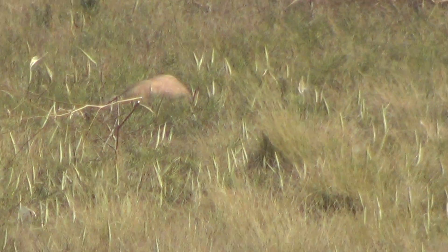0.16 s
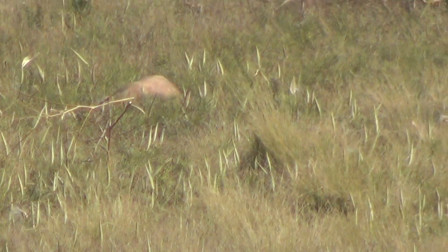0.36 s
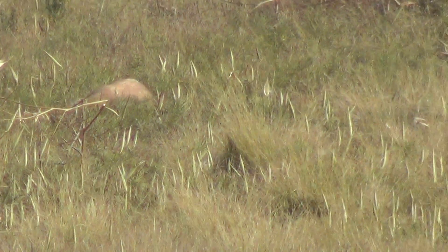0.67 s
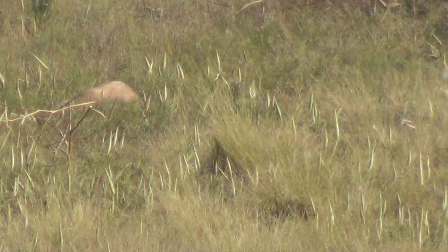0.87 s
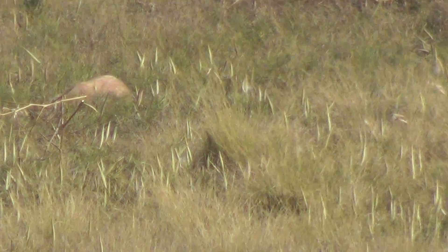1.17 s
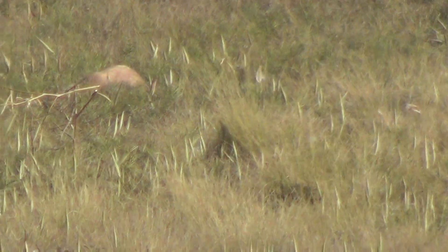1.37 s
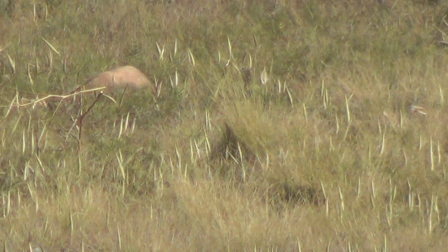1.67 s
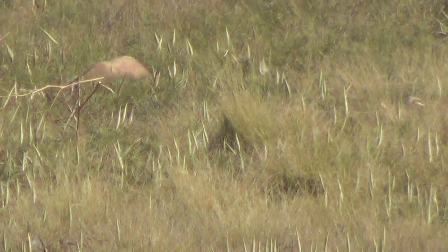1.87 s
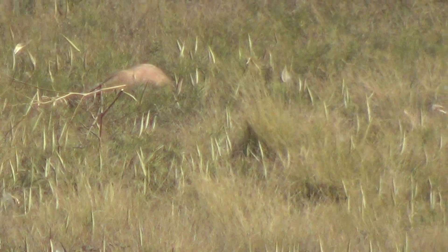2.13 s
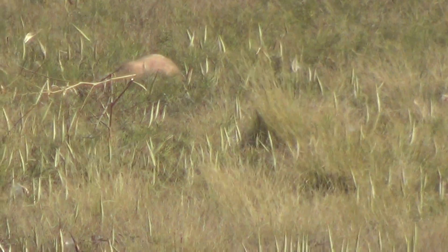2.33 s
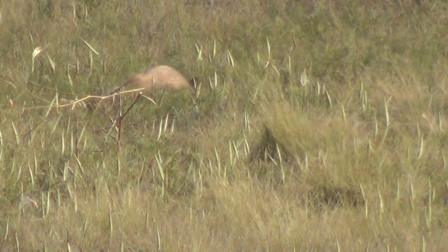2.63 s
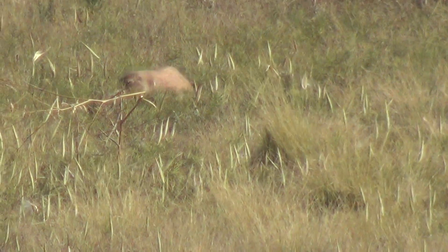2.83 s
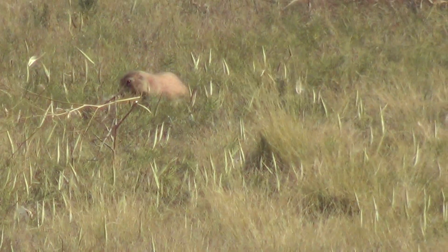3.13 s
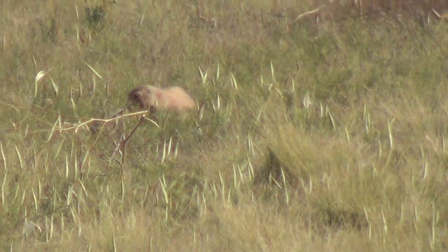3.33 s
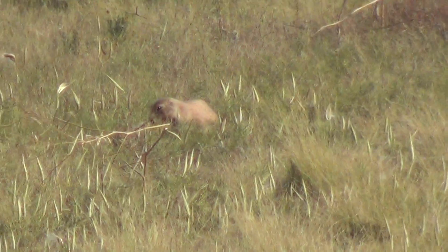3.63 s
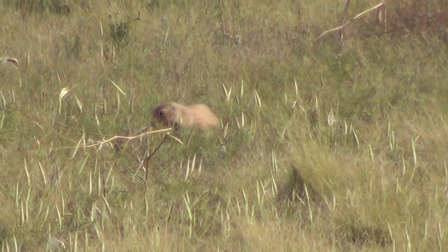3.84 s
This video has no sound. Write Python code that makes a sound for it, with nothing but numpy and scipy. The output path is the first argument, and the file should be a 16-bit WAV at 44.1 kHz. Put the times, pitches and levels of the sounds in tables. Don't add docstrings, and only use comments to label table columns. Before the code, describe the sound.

A prairie dog gives one short, high bark at 2.3 s, breaking rough at its peak, then a weak two-part wheeze at 2.7 s. Tiny far yips sound at 0.1, 0.65 and 3.2 s. Wind rumbles against the microphone; handling ticks and rustles cluster around 1.2-1.6, 2.3 and 3.1 s. A latch snaps at 3.65 s. Tyre roar grows leftward over murmur, hiss, high whine and an early faint hum.

```python
import sys
import numpy as np
from scipy import signal
from scipy.fft import rfft, irfft
from scipy.io import wavfile
from scipy.ndimage import uniform_filter1d

SR = 44100
rng = np.random.default_rng(int(sys.argv[2]) if len(sys.argv) > 2 else 0)


def bounce(signal):
    frames = np.transpose(np.atleast_2d(signal))
    limited = np.clip(frames, -1, 1)
    pcm = np.round(limited * 32767).astype(np.int16)
    wavfile.write(sys.argv[1], SR, pcm)


def gain_from_decibels(decibels):
    exponent = np.asarray(decibels, float) / 20
    return 10 ** exponent


N = 176400
T = np.arange(N) / SR
HZ = np.fft.rfftfreq(N, 1 / SR)
HAND_PAN_DB = -4


def rms_one(x):
    return x / np.sqrt(np.mean(x ** 2) + 1e-20)


def at_hz(points, hz):
    points_hz, points_db = np.transpose(points)
    return np.interp(np.log(hz + 1e-9), np.log(points_hz), points_db)


def at_time(points):
    return np.interp(T, *np.transpose(points))


def colour(x, spectrum):
    return irfft(rfft(x) * gain_from_decibels(at_hz(spectrum, HZ)), N)


def drift(rate_hz):
    r = np.exp(-2 * np.pi * rate_hz / SR)
    white = rng.standard_normal(N + SR)
    return rms_one(signal.lfilter([1], [1, -2 * r, r * r], white)[SR:])


def turns(hz):
    return 2 * np.pi * np.cumsum(hz) / SR


def pan(db):
    return gain_from_decibels(np.array([[.5], [-.5]]) * db)


def swell(start, length, edge):
    return np.clip(np.minimum(T - start, start + length + edge - T) / edge, 0, 1) ** 2


# pitch_hz, level_db (per Hz)
RASP = [(1400, -50), (2000, -8), (2600, 2), (3400, -12), (4200, -21), (5500, -30), (7000, -36)]


def voice(path, throat, hiss_db):
    jitter, wobble_hz, flutter_hz, rasp_db = .032, 250, 700, -1.5
    start_s = path[0][0]
    end_s = path[-1][0]
    s, *columns = np.transpose(path)
    hz, db, rough = (np.interp(T, s, column) for column in columns)
    phase = turns(hz * (1 + jitter * np.sqrt(rough) * drift(wobble_hz)))

    tone = power = 0
    for k in np.arange(2, 10) / 2:
        shake = .55 * (k * k / 2 + .5) * rough
        share = gain_from_decibels(-9) * rough ** 0.37 if k % 1 else 1
        strength = share * gain_from_decibels(at_hz(throat, k * hz))
        flutter = (1 + np.sqrt(shake) * drift(flutter_hz)) / np.sqrt(1 + shake)
        tone = tone + strength * np.sin(k * phase) * flutter
        power = power + strength ** 2 / 2
    tone = tone / np.sqrt(power)

    rasp = rms_one(colour(rng.standard_normal(N) * gain_from_decibels(1.3 * drift(flutter_hz)), RASP))
    rasp = rasp / np.sqrt(uniform_filter1d(rasp ** 2, size=130))

    over_pitch, width_hz = 3.25, 620
    breath = colour(drift(width_hz), [(width_hz, 0), (2 * width_hz, -30)])
    hiss = gain_from_decibels(hiss_db) * rough ** 0.1 * np.sin(over_pitch * phase) * breath
    hiss = hiss * gain_from_decibels(at_hz(throat, over_pitch * hz) + 10.5)

    mix = np.sqrt(1 - rough / 2) * tone + rough * gain_from_decibels(rasp_db) * rasp + hiss
    mix = mix * gain_from_decibels(db) * (T > start_s) * (T < end_s)
    throat_top = signal.cheby1(10, 1, 7000, fs=SR, output="sos")
    return signal.sosfilt(throat_top, mix + 1e-18)


# time_s, pitch_hz, level_db, roughness (0-1)
BARK = [
    (2.296, 1450, -64, .05),
    (2.305, 1600, -46, .08),
    (2.325, 1930, -46.5, .1),
    (2.347, 1965, -45.5, .12),
    (2.356, 2000, -45.5, .9),
    (2.383, 2060, -44.5, .75),
    (2.412, 1910, -47.5, .3),
    (2.431, 1600, -51, .3),
    (2.443, 1260, -64, .4),
]
# pitch_hz, level_db
BARK_THROAT = [(1300, 2), (1700, 1), (2100, 2), (3000, 5.5), (3800, 4), (5000, -22), (6300, -7),
               (7000, -19)]


def bark():
    return voice(BARK, BARK_THROAT, -7)


# time_s, pitch_hz, level_db, roughness (0-1)
WHEEZE = [
    (2.722, 1150, -72, .5),
    (2.748, 1530, -56, .4),
    (2.769, 1660, -52, .45),
    (2.774, 1600, -68, .6),
    (2.779, 1410, -57, .18),
    (2.812, 1460, -55, .04),
    (2.86, 1370, -60.5, .07),
    (2.895, 1270, -62.5, .07),
    (2.904, 1240, -76, .08),
]
# pitch_hz, level_db
WHEEZE_THROAT = [(1500, -5), (3300, 0), (3900, -22), (4300, -18), (4900, -20), (5400, -12), (5850, -22),
                 (6400, -7), (7000, -25)]


def wheeze():
    return voice(WHEEZE, WHEEZE_THROAT, -20)


# start_s, length_s, top_pitch_hz, level_db, second_over_first_db
YIPS = [
    (0.126, 0.051, 1980, -64, 1.5),
    (0.652, .03, 1910, -70, 1),
    (3.227, 0.035, 1910, -71.5, 8),
]


def yips():
    peak_share, rise, fall_per_s, edge_s = .3, .11, 4, .007
    out = 0
    for s, length, hz, db, second_db in YIPS:
        x = np.clip((T - s) / length, 0, 1) - peak_share
        before = rise * (x / peak_share) ** 2
        after = fall_per_s * (length / 0.051) ** 2 * x * length
        sag = np.where(x < 0, before, after) + 0.0164 * drift(226)
        phase = turns(hz * (1 - sag))
        tone = np.sin(phase) + gain_from_decibels(second_db) * np.sin(2 * phase) + gain_from_decibels(-14) * np.sin(3 * phase)
        out = out + gain_from_decibels(db) * tone * swell(s, length - edge_s, edge_s)
    return out


# start_s, length_s, level_db, deep_band_db
GUSTS = [(0.038, 0.097, -61.5, 6), (0.168, 0.13, -54, -2), (0.425, 0.03, -61, 17.5),
         (0.692, 0.035, -51.5, 9.5), (0.759, 0.13, -77, 22.5), (1.022, 0.081, -62.5, 14.5),
         (1.119, 0.11, -51.5, 2), (1.198, 0.14, -54, 8), (1.34, 0.052, -44, 4.5), (1.453, 0.047, -50, 0),
         (1.57, 0.011, -38.5, 1), (1.59, 0.134, -51, 1.5), (1.872, 0.22, -43.5, 1), (2.09, 0.12, -46, -2.5),
         (2.196, 0.11, -46.5, 5), (2.34, 0.31, -60.5, 7), (2.65, 0.072, -48, 7.5),
         (2.724, 0.085, -49.5, 4.5), (2.837, 0.097, -46, 0.5), (2.937, 0.13, -50, 3), (3.444, 0.04, -46, 1),
         (3.494, 0.12, -39.5, -6), (3.616, 0.11, -36.5, -23), (3.722, 0.25, -41, -7.5),
         (3.978, 0.042, -40.5, -0.5)]
# pitch_hz, level_db (per Hz)
WIND = [(25, -47), (90, -10.5), (170, 0.5), (300, -2.5), (480, -11.5), (700, -20.5)]
# time_s, left_minus_right_db
WIND_SIDE = [(0, 3.5), (1, 3), (1.45, -0.5), (2.2, -3), (2.7, 3.5), (4, -2.5)]


def wind():
    edge_s, deep_hz, lump_db, lumps_per_s = .042, 147.4, 4.5, 43
    shapes = [swell(s - edge_s, length + edge_s / 3, edge_s) for s, length, _, _ in GUSTS]
    _, _, db, deep_db = np.transpose(GUSTS)
    shared_air, *own_air = rng.standard_normal((3, N))
    air = rms_one(colour(shared_air + gain_from_decibels(-15) * np.array(own_air), WIND + [(1000, -58)]))
    deep = colour(air, [(deep_hz / 1.13, 0), (deep_hz * 4.4, -40)])
    upper = air - deep

    shared = drift(lumps_per_s)
    deep_lumps, upper_lumps = (gain_from_decibels(lump_db * (0.23 * shared + 0.46 * drift(lumps_per_s)) - 1.5)
                               for _ in range(2))
    deep_gusts = gain_from_decibels(db + deep_db) @ shapes * deep * deep_lumps
    upper_gusts = gain_from_decibels(db) @ shapes * upper * upper_lumps
    side_db = at_time(WIND_SIDE) + 3 * drift(3.4)
    return pan(side_db) * (deep_gusts + upper_gusts)


def struck(hits, side_db, shell_db):
    length = 500
    out = np.zeros((2, N + length))
    t = np.arange(length) / SR
    for s, db, hz in hits:
        decay = gain_from_decibels(-60 * t * hz / (4 + hz / 900))
        ring = np.sin(2 * np.pi * hz * t) * decay * np.minimum(t * hz / 3.0, 1)
        snap = gain_from_decibels(-15) * rng.standard_normal(length) * np.exp(-t / 0.00081)
        knock = gain_from_decibels(4) * np.sin(2 * np.pi * 1530 * t) * np.exp(-t / 0.00025)
        start = int(s * SR)
        hit = 2.57 * ring + gain_from_decibels(shell_db) * (snap + knock)
        out[:, start:start + length] += gain_from_decibels(db) * pan(side_db) * hit
    return out[:, :N]


# start_s, peak_db, ring_hz
TICKS = [(.529, -48, 3300), (.7265, -47.5, 3620), (.7265, -52, 8400), (.735, -51, 3400), (.735, -54, 8600),
         (1.206, -45, 2780), (1.281, -43.5, 3470), (1.355, -44, 3500), (1.442, -37, 2280),
         (1.481, -45, 1830), (1.4815, -40, 4500), (1.4842, -40, 2000), (1.487, -41, 1700),
         (1.508, -35, 2270), (1.545, -44, 5040), (1.705, -49, 11900), (2.242, -42, 4250),
         (2.2455, -44, 4500), (2.271, -52, 9500), (2.305, -47, 8200), (2.305, -45, 12300),
         (2.401, -53.5, 11000), (2.412, -51, 9000), (2.424, -49, 8400), (2.657, -41.5, 5540),
         (2.833, -55, 4530), (3.0975, -38, 1870), (3.1015, -47, 2200), (3.137, -54, 13500),
         (2.777, -47, 7800), (3.088, -52, 6960), (3.098, -47, 10500), (3.1035, -36.5, 3800),
         (3.123, -42, 13000), (3.128, -38, 1980), (3.633, -33, 3180), (3.6376, -29.5, 1760),
         (3.6555, -36, 9100)]


def ticks():
    return struck(TICKS, HAND_PAN_DB, 0)


# delay_s, level_db
LATCH_BOUNCES = [
    (0, 1.5),
    (.002, -13),
    (.0045, -21),
]


def latch():
    hits = [(3.6455 + delay, -19 + db, 10700) for delay, db in LATCH_BOUNCES]
    return struck(hits, 4.5, -12)


# start_s, peak_db, dulled_above_hz
SNAPS = [(1.28, -56, 8000), (1.33, -51, 6000), (1.346, -50, 6000), (1.393, -50.5, 4000), (1.442, -48, 6000),
         (1.461, -50, 8000), (1.4925, -50, 7000), (1.5098, -46, 6000), (1.517, -51, 9000),
         (1.535, -45, 11000), (1.545, -51, 10000), (1.563, -48, 9000), (1.594, -47, 6000),
         (3.0997, -44, 14000), (2.658, -49, 7000), (2.242, -50, 14000), (2.2757, -38.5, 15000),
         (2.28, -47, 12000), (2.71, -48.5, 8000), (2.822, -45.5, 8000), (3.088, -40, 11000),
         (3.109, -56, 14000), (3.119, -56, 13000), (3.1223, -45, 9000), (3.147, -48, 13000)]


def snaps():
    rebound_s, rebound_share, length = .000375, .6, 200
    out = np.zeros(N)
    for s, db, hz in SNAPS:
        click = np.zeros(length)
        click[0] = 1
        click[int(rebound_s * SR)] = rebound_share
        band = signal.butter(2, [1800, min(hz, 18000)], "band", fs=SR, output="sos")
        click = signal.sosfilt(band, click)
        start = int(s * SR)
        out[start:start + length] += gain_from_decibels(db) * click / np.abs(click).max()
    return out


# start_s, length_s, level_db
RUSTLES = [
    (1.28, 0.11, -66.5),
    (1.463, 0.061, -61.5),
    (1.547, 0.06, -60.5),
    (2.258, 0.013, -57),
    (3.092, 0.043, -56.5),
    (3.639, 0.02, -54),
]
# pitch_hz, level_db
RUSTLE = [(900, 7), (2000, 4), (5000, -5), (16000, -9.5)]


def rustle():
    sizes = gain_from_decibels(3 * np.minimum(rng.exponential(1, N), 4)) * rng.choice([-1, 1], N)
    grains_per_s = 7000 * gain_from_decibels(3 * drift(60))
    grains = sizes * (rng.random(N) < grains_per_s / SR)
    level = sum(gain_from_decibels(db) * swell(s - length / 4, length * 1.41, length / 4) for s, length, db in RUSTLES)
    return level * rms_one(colour(grains, [(400, -30)] + RUSTLE))


# time_s, level_db
APPROACH = [
    (0, -63),
    (.9, -62.5),
    (1.5, -54.5),
    (2.2, -52.5),
    (3.4, -48),
    (4, -46),
]
# pitch_hz, level_db (per Hz)
ROAR = [(60, -22.5), (300, -5.5), (550, 0), (850, 2), (1350, -4), (2200, -15.5), (3800, -26.5), (4600, -62)]
# pitch_hz, level_db
ROAR_SHADOW = [(350, -1), (650, -17.5), (900, -20.5), (1250, -9.5), (2400, -3.5), (4000, -3)]


def vehicle():
    echo_lag_s, echo_share, echo_turn = 0.00193, 0.12, 2.86
    white = rng.standard_normal(N)
    comb = 1 + echo_share * np.exp(1j * (echo_turn + 2 * np.pi * HZ * echo_lag_s))
    left = rms_one(colour(irfft(rfft(white) * comb, N), ROAR))
    shadow = np.interp(T, [0, 2.8], [0.37, 1])
    right = shadow * colour(left, ROAR_SHADOW) + (1 - shadow) * left
    return gain_from_decibels(at_time(APPROACH) + drift(2.46)) * np.array([left, right])


# pitch_hz, level_db
FIELD = [(25, -15.5), (100, 4.5), (300, -1), (500, -6), (900, -15), (2200, -18), (4500, -19.5),
         (16000, -21.5)]
# pitch_hz, likeness (0-1)
LIKENESS = [(30, 0.49), (400, 0.84), (1500, 0.94), (8000, 0.78), (11500, 0.97), (12500, 1)]


def field():
    alike = np.clip(at_hz(LIKENESS, HZ), 0, 1)
    mid, side = rfft(colour(rng.standard_normal((2, N)), FIELD))
    mid = np.sqrt(1 + alike) * mid
    side = np.sqrt(1 - alike) * side
    return gain_from_decibels(-62.5) * rms_one(irfft(np.array([mid + side, mid - side]), N))


def hum():
    tone = np.sin(turns(296.6 + 6 * drift(3.58)))
    return tone * gain_from_decibels(-68.5 + 1.6 * drift(14.0)) * swell(-0.82, 3.12, 0.27)


def whine():
    line_hz, field_rate_hz, blank_share = 15734.3, 59.94, .1
    blank = (T * field_rate_hz % 1) < blank_share
    return gain_from_decibels(-62.5) * np.sin(2 * np.pi * line_hz * T) * (1 - gain_from_decibels(-22.5) / blank_share * blank)


# time_s, gain_db
CAMERA_GAIN = [
    (1, -1),
    (2.5, 2.5),
]


def scene():
    dogs = (bark() + wheeze() + yips()) * pan(-3)
    hands = ticks() + latch() + (rustle() + snaps()) * pan(HAND_PAN_DB)
    steady = (field() + hum() + whine()) * gain_from_decibels(at_time(CAMERA_GAIN))
    return dogs + wind() + hands + vehicle() + steady


def roll_off(x):
    return signal.sosfilt(signal.butter(12, 17550, fs=SR, output="sos"), x)


def record(dry):
    top_cut = signal.cheby2(12, 60, 17100, fs=SR, output="sos")
    mix = signal.sosfilt(top_cut, dry)
    return roll_off(mix)


dry = scene()
out = record(dry)
bounce(out)
```